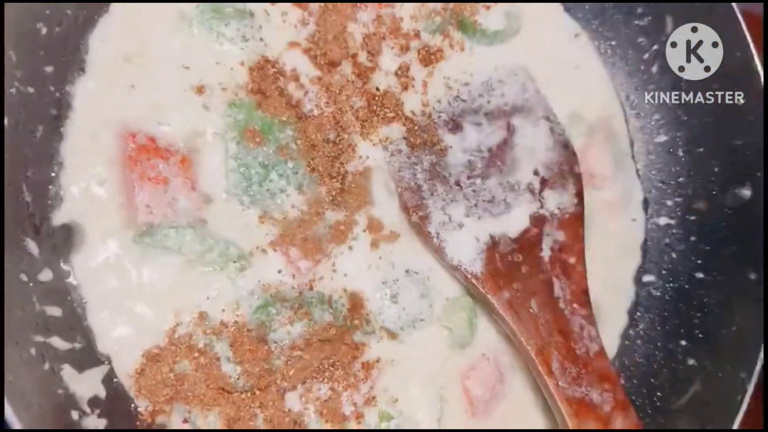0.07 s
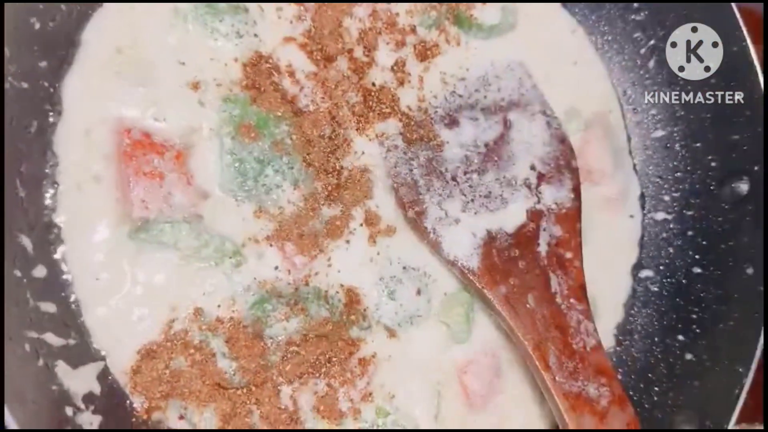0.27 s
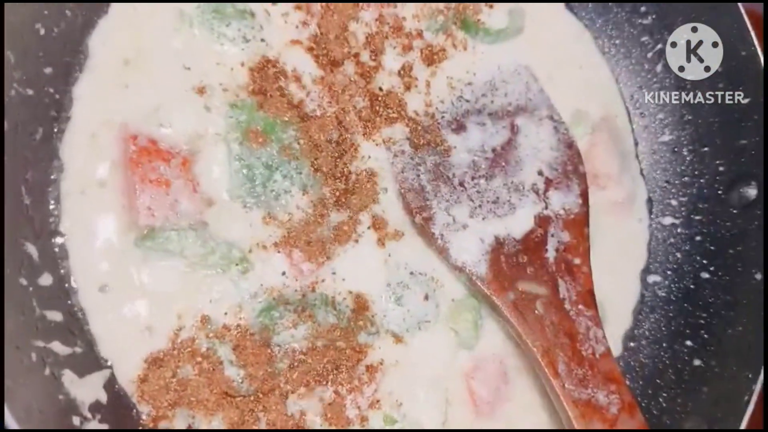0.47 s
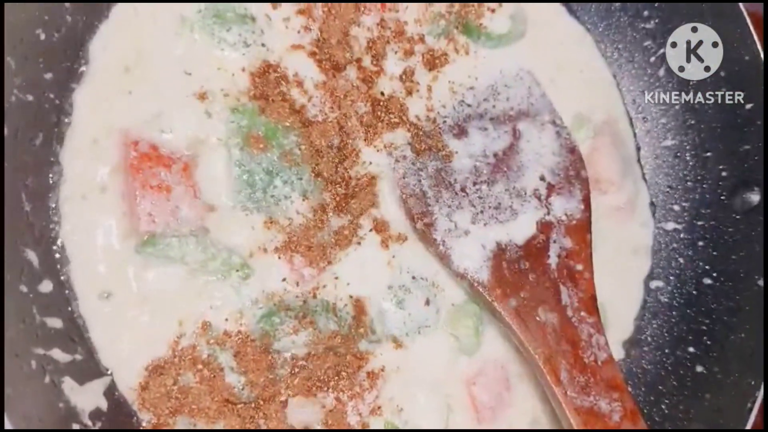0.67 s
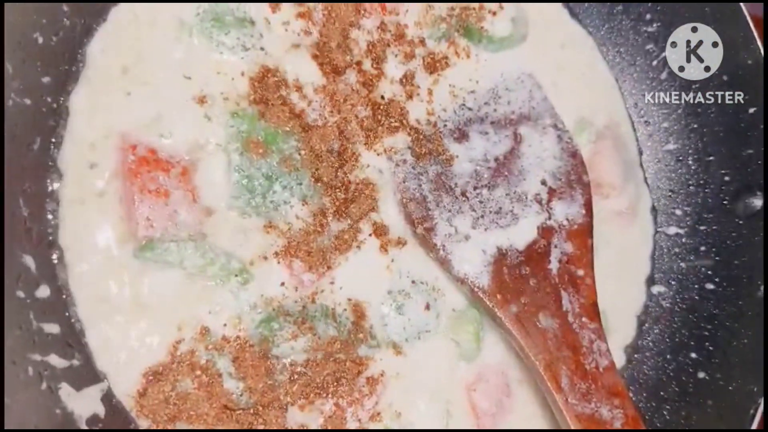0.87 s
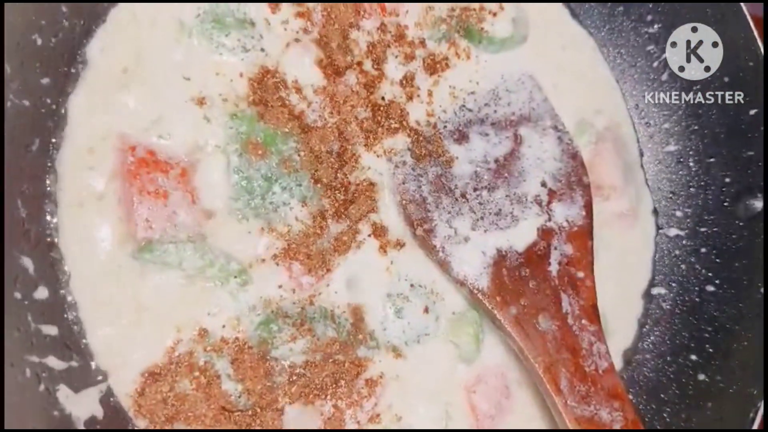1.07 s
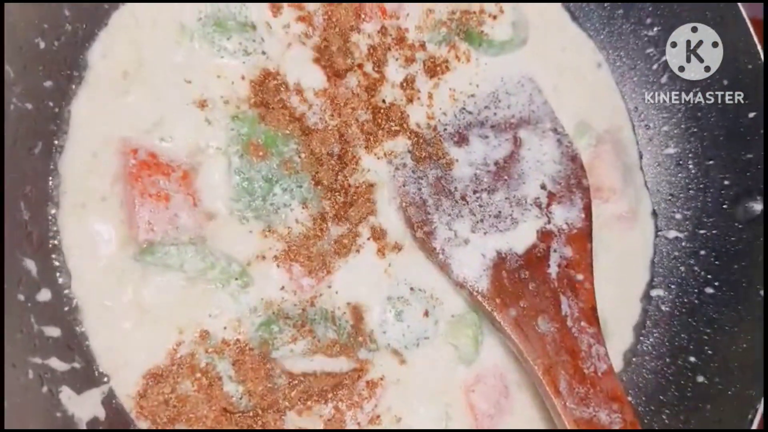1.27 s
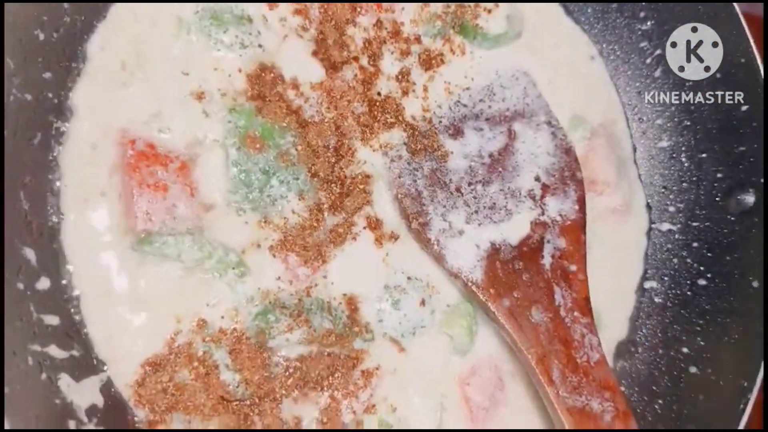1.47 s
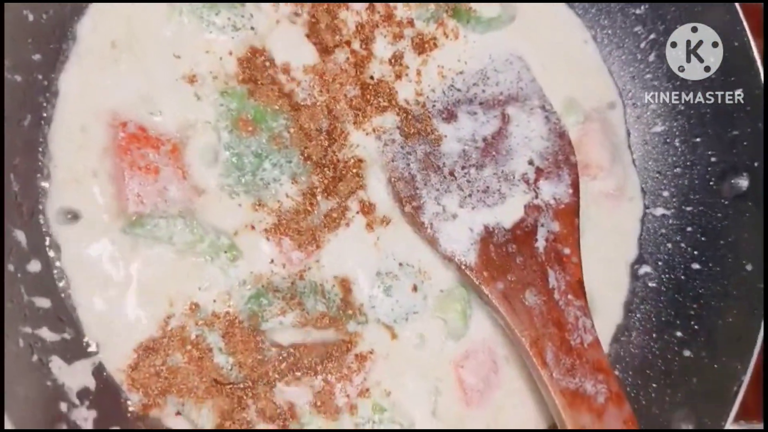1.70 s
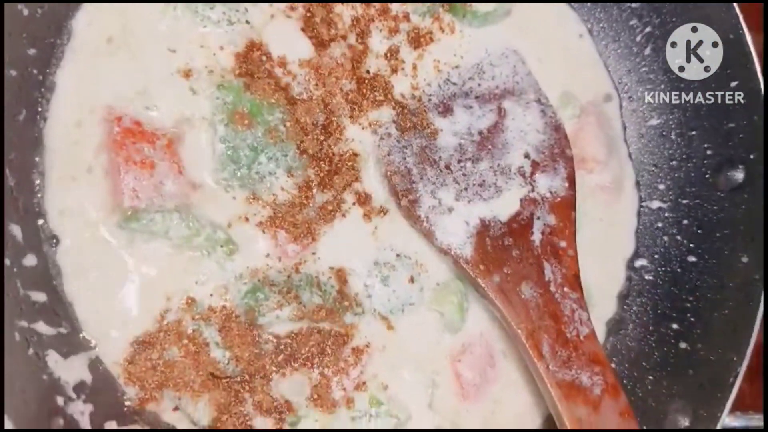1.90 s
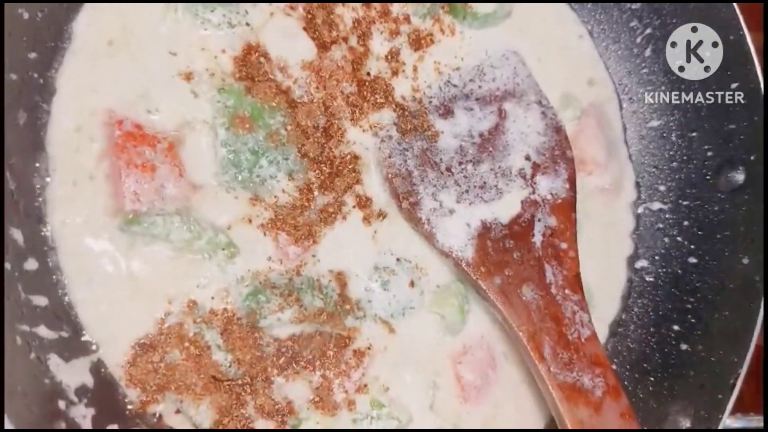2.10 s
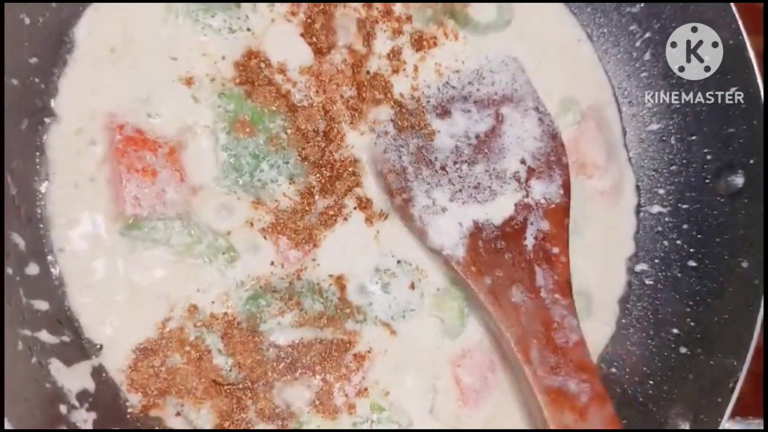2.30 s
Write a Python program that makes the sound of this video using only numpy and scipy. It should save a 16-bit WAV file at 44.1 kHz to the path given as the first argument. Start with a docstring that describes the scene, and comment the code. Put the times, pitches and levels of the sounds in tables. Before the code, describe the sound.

Close stereo sound of a thick sauce bubbling: steady low rush and faint hum, delicate sizzle at the rim, scattered snapping bubbles, soft round knocks and small wet squelches, with short indoor echoes.

```python
"""Gravy simmering in a pan

Thick gravy simmers in a nonstick pan, heard from close above in a small kitchen. Tiny bubbles fizz along
the hot rim as short rings, and their patter keeps the pan softly ringing. Larger bubbles pop as quick
dying waves, plop with a hollow knock, squelch as sliding notes or spit out steam as bursts of noise.
Low glugs and small blips come from the sauce. The stove rushes as shaped noise and hums as a low tone.
"""
import sys
import numpy as np
from scipy import signal
from scipy.io import wavfile

SR = 44100
rng = np.random.default_rng(int(sys.argv[2]) if len(sys.argv) > 2 else 0)


def transcribe(signal):
    """Save signal, clipped to [-1, 1], as a 16-bit WAV file at the path in sys.argv[1]."""
    frames = np.atleast_2d(signal).T
    limited = np.clip(frames, -1, 1)
    pcm = np.round(limited * 32767).astype(np.int16)
    wavfile.write(sys.argv[1], SR, pcm)


N = 103546
TIME = np.arange(N) / SR   # seconds

# A "t60" is the time in which a sound fades by 60 dB; "cycles" of ringing count up to that point.
# A positive pan is towards the left, a negative one towards the right.

# slow swell of the bass: start_s, level_db
RUMBLE = [(0, 1), (.2, -3), (.45, 1), (.8, 0.5), (1.15, 0), (1.55, 1), (1.85, -4), (2.15, -.5),
          (2.35, -0.5)]
RUMBLE_BELOW_HZ = 300
HUM_HZ, HUM_DB, HUM_WAVER_DB = 48.1, -51, -1

# smooth rush of stove and steam, before its overall level: pitch_hz, level_db (per Hz)
RUSH = [(30, -19), (42, -7), (65, 1.5), (100, -2), (200, 2.5), (290, -3), (450, -5.5), (640, -6.5),
        (1250, -7), (2000, -7), (3800, -15.5), (7000, -9.5), (10000, -14), (13000, -15), (15500, -14)]
# side that the rush leans to: pitch_hz, left_minus_right_db
RUSH_PAN = [(100, 0.5), (300, 4), (700, -1), (1500, -4), (3500, -6), (6500, 5), (12000, -3), (15000, 0)]
# how alike the two ears are, held between -1 and 1 when used: pitch_hz, likeness (no unit)
LIKENESS = [(50, 0.98), (170, 1), (280, 0.59), (400, -0.65), (700, 0.012), (1050, -1.4), (1500, -0.74),
            (3000, 0.085), (6000, 0.14), (12000, 0.049)]
RUSH_DB, RUSH_FLICKER_DB = -43, 2

# notes that pan and sauce ring with:
# pitch_hz, level_db, t60_s, left_minus_right_db, right_ear_lag_cycles
PAN_MODES = [(124.9, -52.5, 0.17, -1.5, 0), (162.3, -53.5, 0.099, 6.5, 0), (340, -55, 0.081, -3, -0.41),
             (378.8, -53, 0.22, 7, -0.16), (409.6, -54.5, 0.22, 4, -0.31), (473, -57.5, 0.22, -2.5, -0.045),
             (709, -59, 0.062, 17.5, 0.41), (870, -53.5, 0.059, 11, 0.47), (965, -54.5, 0.11, -0.5, 0.11),
             (1051.5, -50, 0.097, -4, 0.15), (1128, -53.5, 0.09, -6.5, -.2), (2921, -51, 0.045, 6.5, -0.38),
             (6880, -49, 0.0031, 35, 0)]
RING_TAPS_PER_S, RING_SPREAD_DB = 700, 3
RING_DIFFUSE_DB = -11   # part of the ringing that reaches each ear by its own path

# steam heaving under the thick sauce: start_s, level_db, pitch_hz
GLUGS = [(0.019, -45, 110), (0.525, -46, 168), (0.699, -48.5, 164), (0.698, -39.5, 332), (0.771, -44, 130),
         (0.944, -49, 118), (1.46, -46, 393)]
GLUG_S, GLUG_T60_S = 0.05, 0.036

# small soft bubbles in the body of the sauce, before their overall level: pitch_hz, level_db
BLIPS = [(330, -13.5), (440, 3.5), (600, -9.5), (800, -8.5), (980, 12.5), (1150, 6.5), (1400, -9)]
BLIPS_DB, BLIPS_PER_S, BLIP_CYCLES = -49.5, 240, 10.8
BLIP_SPREAD_DB, BLIP_PAN_SCATTER_DB = 1, 10.5

# large slow bubbles with a hollow knock: start_s, level_db, pitch_hz, left_minus_right_db
PLOPS = [(0.088, -31, 1070, -7), (.098, -33, 1020, 2), (.597, -35, 960, 10), (0.6145, -34, 1078, -15),
         (.858, -31, 1030, 1), (1.1117, -32.5, 1123, 1), (1.302, -35.5, 1030, 26), (1.501, -33, 1034, -18),
         (1.722, -32.5, 1026, -3), (2.059, -31, 1090, 14)]
PLOP_CYCLES, PLOP_TICK_DB, PLOP_TICK_T60_S = 45.6, -10, 0.049

# wet bubbles that slide in pitch:
# start_s, length_s, level_db, start_pitch_hz, end_pitch_hz, left_minus_right_db
SQUELCHES = [(0.565, 0.0178, -41, 2067, 3000, 2), (0.565, .03, -46, 1315, 1610, -1),
             (1.635, 0.013, -41, 2290, 2500, 6), (1.749, 0.0368, -41, 1456, 1274, 3),
             (1.761, 0.024, -42.5, 2990, 3560, 3), (1.902, 0.033, -48, 2444, 2150, 1),
             (2.234, 0.0088, -41, 2590, 2220, 3)]
SQUELCH_WOBBLE, SQUELCH_WOBBLES_PER_S = 0.042, 174   # share of the pitch; rate

# steam escaping through the sauce: start_s, length_s, level_db, centre_hz, left_minus_right_db
SPITS = [(0.084, 0.03, -42.5, 3400, 17), (0.266, 0.01, -34, 4920, 10), (0.328, 0.018, -42, 4070, 3),
         (0.421, 0.022, -39.5, 2720, 6), (.5922, 0.014, -40, 6840, -9), (0.5926, 0.0072, -28.5, 14400, -14),
         (0.748, 0.018, -38, 2560, 7), (0.7554, 0.0034, -29.5, 14300, 3), (0.7555, 0.0039, -40, 9900, 3),
         (0.983, 0.026, -39, 3460, 3), (1.292, 0.04, -39.5, 2630, 7), (1.317, 0.0024, -31, 6500, 30),
         (1.65, 0.02, -40, 5470, 4), (1.724, 0.0087, -35, 5640, 6), (1.91, 0.035, -40.5, 1610, 22),
         (2.25, 0.025, -33, 2220, 1), (2.253, 0.01, -30.5, 9400, -2)]
SPIT_WIDTH, SPIT_HISS_DB, SPIT_RISE = 0.4, -1, 0.52   # width over centre; broad hiss; rising share
SPIT_GRAINS_PER_S, SPIT_GRAIN_DB = 2300, 0.5   # droplets tearing off in the jet; their spread

# bubbles that snap open: start_s, level_db, pitch_hz, rise_s, left_minus_right_db
POPS = [(0.1007, -22, 4560, 0.00014, 30), (0.2286, -24.5, 5700, 0.00015, 37),
        (0.2724, -26, 5130, 0.00014, 4), (.31, -27, 6830, 0.00027, 18), (0.4753, -23, 5650, 0.00027, 25),
        (0.491, -31, 6600, .0002, 2), (0.593, -15, 14700, 0.00017, -15), (0.5935, -14, 6500, 0.00028, 1),
        (0.651, -24.5, 2350, 0.00022, 17), (0.666, -25, 5300, 0.00034, 5), (.677, -22.5, 6560, 0.00011, 12),
        (0.7138, -27, 4830, 0.00027, 8), (0.7556, -18, 12000, 0.000073, 8),
        (0.813, -21.5, 6800, 0.00017, 8), (0.8404, -13, 6300, 0.000066, 6), (.877, -25, 6950, 0.00024, 32),
        (0.9214, -26.5, 2300, 0.00025, 30), (0.954, -27, 7440, 0.00019, 15), (.9893, -21, 6000, .0002, 8),
        (0.9932, -19, 4200, 0.00013, 4), (1.0105, -26, 2700, 0.00027, 5), (1.0334, -13, 5300, 0.00014, 10),
        (1.0375, -17.5, 6800, 0.0002, 19), (1.0428, -24, 5250, 0.00029, -1),
        (1.0828, -26.5, 3120, 0.00028, 4), (1.1155, -21, 7360, .0002, 13), (1.135, -25, 6200, 0.00056, 11),
        (1.218, -25, 7000, .0003, 26), (1.2609, -20, 6800, 0.000087, 8), (1.323, -17.5, 7740, 0.00018, 28),
        (1.523, -28, 2920, 0.00054, 6), (1.5517, -19.5, 6760, 0.00022, 6), (1.7204, -17, 6800, 0.00017, 5),
        (1.7735, -23, 5630, 0.00014, 11), (1.8745, -23, 3730, 0.00026, 9), (1.944, -19.5, 5300, 0.00022, 9),
        (1.954, -34, 5640, 0.00024, -2), (1.987, -26, 5840, .0003, 12), (2.0493, -14.5, 5380, 0.00039, 20),
        (2.0487, -16.5, 9560, 0.00016, 7), (2.12, -25, 5340, 0.00018, -22), (2.133, -22, 4730, 0.00011, 15),
        (2.153, -28, 3100, 0.00058, 3), (2.2645, -13, 5140, 0.00016, 11), (2.3284, -26, 5200, .0002, -2)]
CRACK_DB, CRACK_T60_S, CRACK_WIDTH = -14, 0.014, 0.4   # width over the pop's pitch
EAR_LEAD_CYCLES = 0.38   # lead of the right ear in pops and squelches

# tiny bubbles at the rim, before their overall level: pitch_hz, level_db
FIZZ = [(1300, -22), (2000, -11.5), (2700, 4), (3700, -8), (5000, 6), (6600, -6), (9000, -6.5),
        (12000, -11), (15000, -7)]
FIZZ_DB, FIZZ_PER_S, FIZZ_SPREAD_DB = -49, 800, 1
FIZZ_CYCLES, FIZZ_RISE_CYCLES = 13, 4.5
FIZZ_PAN_DB, FIZZ_PAN_SCATTER_DB = 4.5, 1

# vigour of the simmer: start_s, level_db
VIGOUR = [(0, 0), (.19, -4), (.34, 3.5), (.40, -2.5), (.56, -0.5), (.68, 1), (.80, -2.5), (1.02, 0.5),
          (1.16, -2), (1.30, 0), (1.43, -1), (1.53, 2), (1.66, 0.5), (1.70, -2.5), (1.77, 1.5), (1.97, -1),
          (2.13, 3), (2.19, -2.5), (2.35, 2)]
SURGE_DB, SURGES_PER_S = .5, 21

WALL_DB, WALL_T60_S = -4, 0.01728   # echoes between the pan's walls
ROOM_DB, ROOM_T60_S = -10.5, 0.17   # echoes of the kitchen
CUTOFF_HZ = 15650


def from_db(db):
    """Turn decibels into a gain."""
    return 10 ** (np.asarray(db) / 20)


def rms_one(x):
    """Scale a sound to an rms (average strength) of 1."""
    return x / np.sqrt(np.mean(x ** 2) + 1e-20)


def at_hz(points, hz):
    """Read a table between its points, with pitch on a log scale."""
    f, v = np.transpose(points)
    return np.interp(np.log(hz), np.log(f), v)


def at_time(points):
    """Read a table of (s, dB) at every moment."""
    return np.interp(TIME, *np.transpose(points))


def panned(db):
    """Left and right gains that keep the same total power."""
    gains = from_db(np.array([[1], [-1]]) * db / 2)
    return gains / np.sqrt(np.mean(gains ** 2, axis=0))


def fade(t, t60):
    """Die away steadily, by 60 dB in each t60."""
    return np.exp(-np.log(1000) * t / t60)


def width_t60(width, hz):
    """Ringing time of a resonance from its width over its pitch: wider dies sooner."""
    return np.log(1000) / (np.pi * width * hz)


def drift(rate_hz):
    """Smooth random wandering with an rms of 1, made at every 40th sample."""
    r = np.exp(-80 * np.pi * rate_hz / SR)
    noise = rng.standard_normal(N // 40 + 2002)
    slow = signal.lfilter([1], [1, -2 * r, r * r], noise)[2000:]   # skip the filter's start
    return np.interp(np.arange(N) / 40, np.arange(len(slow)), rms_one(slow))


def ring(x, hz, t60):
    """A unit click sets a sine of height 1 ringing, with little below its pitch."""
    r, w = fade(1 / SR, t60), 2 * np.pi * hz / SR
    return signal.lfilter([.5, 0, -.5], [1, -2 * r * np.cos(w), r * r], x + 1e-18)


def band_pass(x, low, high):
    """Keep what lies between two pitches."""
    return signal.sosfilt(signal.butter(2, [low, high], "band", fs=SR, output="sos"), x)


def high_pass(x, hz):
    """Take away the lows."""
    return signal.sosfilt(signal.butter(2, hz, "high", fs=SR, output="sos"), x)


def stereo(pair, hz):
    """Blend two unrelated signals into left and right, alike in the bass."""
    alike = np.clip(at_hz(LIKENESS, hz), -1, 1)
    shared = np.sqrt(1 + alike) * pair[0]
    opposed = np.sqrt(1 - alike) * pair[1] * [[1], [-1]]
    return shared + opposed


def clicks(per_s, spread_db):
    """Random clicks, many small and a few large."""
    born = rng.random(N) < per_s / SR
    size_db = spread_db * np.minimum(rng.exponential(1, N), 4.2)
    return born * from_db(size_db) * rng.choice([-1, 1], N)


def add(out, s, sound):
    """Mix a stereo sound in at time s."""
    i = int(s * SR)
    out[:, i:i + sound.shape[1]] += sound[:, :max(N - i, 0)]


def echoes(x, t60):
    """Dense dying reflections, different at each ear."""
    t = TIME[:SR // 3]
    tail = rng.standard_normal((2, len(t))) * fade(t, t60) * (t > t60 / 20)
    tail = tail / np.sqrt(np.sum(tail ** 2, axis=1, keepdims=True))
    return signal.fftconvolve(x, tail, axes=1)[:, :N]


def rumble_db(hz):
    """The bass swells and sinks slowly."""
    return at_time(RUMBLE) * (hz < RUMBLE_BELOW_HZ)


def hum():
    """A low sine hums with a slightly wavering level and phase."""
    level = from_db(HUM_DB + HUM_WAVER_DB * drift(5.0))
    return level * np.sin(2 * np.pi * HUM_HZ * TIME + 0.23 * drift(0.67))


def rush(vigour_db, follows=0.54, steam_from_hz=1200):
    """Flickering noise bands: stove below and steam hiss above; the steam follows the simmer."""
    out, edges = 0, np.geomspace(30, 17000, 23)
    white = rng.standard_normal((2, 2, N))
    for k, (low, high) in enumerate(zip(edges, edges[1:])):
        hz = np.sqrt(low * high)
        band = band_pass(white[k % 2], low, high)   # neighbouring bands use different noise
        db = at_hz(RUSH, hz) + rumble_db(hz) + RUSH_FLICKER_DB * drift(19.8)
        db = db + follows * vigour_db * (hz > steam_from_hz)
        out = out + from_db(db) * panned(at_hz(RUSH_PAN, hz)) * stereo(band, hz)
    return from_db(RUSH_DB) * rms_one(out)


def pan_ring(vigour_db):
    """Pattering bubbles keep the pan's notes sounding, each at its own level and lag at the ears."""
    out, per_s = 0, RING_TAPS_PER_S * from_db(vigour_db)
    taps = np.array([clicks(per_s, RING_SPREAD_DB) for _ in range(3)])
    for hz, db, t60, pan_db, lag in PAN_MODES:
        direct, *diffuse = ring(taps, hz, t60)
        lagged = np.interp(TIME - lag / hz, TIME, direct)
        ears = np.array([direct, lagged]) + from_db(RING_DIFFUSE_DB) * np.array(diffuse)
        out = out + from_db(db + rumble_db(hz)) * panned(pan_db) * rms_one(ears)
    return out


def glugs():
    """Steam shifts under the sauce with a dull, low swell of ringing noise."""
    out, t = np.zeros((2, N)), TIME[:SR // 5]
    swell = np.sin(np.pi * np.minimum(t / GLUG_S, 1))
    for s, db, hz in GLUGS:
        noise = ring(rng.standard_normal((2, len(t))), hz, GLUG_T60_S)
        heave = swell * stereo(noise, hz)
        # the level is that of the swell's peak, not of the whole stretch
        add(out, s, from_db(db) * rms_one(heave) * np.sqrt(np.mean(swell ** 2)))
    return out


def blips():
    """Small bubbles surface at random all over the sauce, each ringing briefly."""
    out, pitches = 0, np.geomspace(330, 1400, 20)
    for hz in pitches:
        places = panned(BLIP_PAN_SCATTER_DB * rng.standard_normal(N))
        taps = clicks(BLIPS_PER_S / len(pitches), BLIP_SPREAD_DB) * places
        taps[1] = np.roll(taps[1], rng.integers(-40, 40))   # shift the right ear, in samples
        out = out + from_db(at_hz(BLIPS, hz)) * rms_one(ring(taps, hz, BLIP_CYCLES / hz))
    return from_db(BLIPS_DB) * rms_one(out)


def plops():
    """Large bubbles open with a wet tick of noise and a soft hollow knock that rings."""
    out, t = np.zeros((2, N)), TIME[:SR // 10]
    for s, db, hz, pan_db in PLOPS:
        tick = ring(rng.standard_normal((2, len(t))), hz, 2 / hz)
        tick = rms_one(tick) * fade(t, PLOP_TICK_T60_S)
        knock = ring(t == 0, hz, PLOP_CYCLES / hz)
        add(out, s, from_db(db) * panned(pan_db) * (knock + from_db(PLOP_TICK_DB) * tick))
    return out


def squelches():
    """Steam squeezes through a soft opening whose unsteady note slides as it widens or closes."""
    out = np.zeros((2, N))
    for s, length, db, start_hz, end_hz, pan_db in SQUELCHES:
        along = TIME[:int(length * SR)] / length   # 0 to 1
        wobble, flutter = (drift(SQUELCH_WOBBLES_PER_S)[:len(along)] for _ in range(2))
        hz = start_hz * (end_hz / start_hz) ** along * (1 + SQUELCH_WOBBLE * wobble)
        cycles = np.cumsum(hz) / SR + np.array([[0], [EAR_LEAD_CYCLES]])
        note = np.sin(2 * np.pi * cycles) * np.abs(flutter) * np.sin(np.pi * along)
        add(out, s, from_db(db) * panned(pan_db) * rms_one(note))
    return out


def spits():
    """A short sputtering jet of steam swells and dies, coloured by the hole that it leaves through."""
    out, t = np.zeros((2, N)), TIME[:SR // 10]
    for s, length, db, hz, pan_db in SPITS:
        grains = clicks(SPIT_GRAINS_PER_S, SPIT_GRAIN_DB)[:2 * len(t)]
        jet = rms_one(grains.reshape(2, -1))   # separate droplets for each ear
        hole = rms_one(ring(jet, hz, width_t60(SPIT_WIDTH, hz)))
        hiss = from_db(SPIT_HISS_DB) * high_pass(jet, hz / 2)
        swell = np.sqrt(np.interp(t / length, [0, SPIT_RISE, 1], [0, 1, 0]))
        sputter = rms_one(swell * (hole + hiss)) * np.sqrt(np.mean(swell ** 2))
        add(out, s, from_db(db) * panned(pan_db) * sputter)
    return out


def pops():
    """A film tears: the cavity swings up and dies within a few cycles, and a faint wet crack trails it."""
    out, t = np.zeros((2, N)), TIME[:SR // 20]
    for s, db, hz, rise, pan_db in POPS:
        crack = ring(rng.standard_normal((2, len(t))), hz, width_t60(CRACK_WIDTH, hz))
        crack = rms_one(crack) * fade(t, CRACK_T60_S)
        cycles = hz * t + np.array([[0], [EAR_LEAD_CYCLES]])
        cavity = 2 * t / rise * np.exp(-t / rise) * np.sin(2 * np.pi * cycles)
        add(out, s, from_db(db) * panned(pan_db) * (cavity + from_db(CRACK_DB) * crack))
    return out


def fizz(vigour_db):
    """Tiny bubbles burst at the rim, each ringing a few cycles at its own pitch and place."""
    out, pitches = 0, np.geomspace(1300, 15000, 30)
    for hz in pitches:
        taps = clicks(FIZZ_PER_S / len(pitches) * from_db(vigour_db), FIZZ_SPREAD_DB)
        places = panned(FIZZ_PAN_DB + FIZZ_PAN_SCATTER_DB * rng.standard_normal(N))
        grains = ring(rms_one(taps) * places, hz, FIZZ_CYCLES / hz)
        grains = ring(grains, hz, FIZZ_RISE_CYCLES / hz)   # a second ring softens the onset
        grains[1] = np.roll(grains[1], rng.integers(-10, 20))   # shift the right ear, in samples
        out = out + from_db(at_hz(FIZZ, hz)) * rms_one(grains)
    return from_db(FIZZ_DB + vigour_db) * rms_one(out)


def scene():
    """All bubbles echo in the kitchen, the sharper ones in the pan too, over the stove and ringing pan."""
    vigour_db = at_time(VIGOUR) + SURGE_DB * drift(SURGES_PER_S)
    background = hum() + rush(vigour_db) + pan_ring(vigour_db)
    bubbles = squelches() + spits() + pops() + fizz(vigour_db)
    bubbles = bubbles + from_db(WALL_DB) * echoes(bubbles, WALL_T60_S)
    bubbles = bubbles + glugs() + blips() + plops()
    return background + bubbles + from_db(ROOM_DB) * echoes(bubbles, ROOM_T60_S)


def record(dry):
    """Cut the top steeply."""
    return signal.sosfilt(signal.ellip(10, .2, 80, CUTOFF_HZ, fs=SR, output="sos"), dry)


dry = scene()
out = record(dry)
transcribe(out)
```